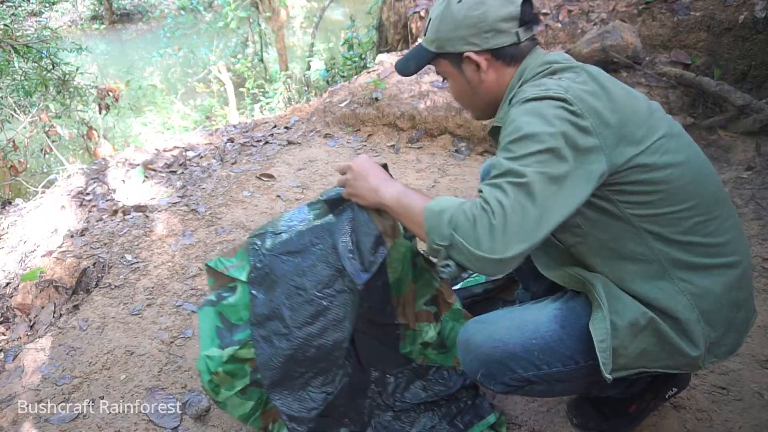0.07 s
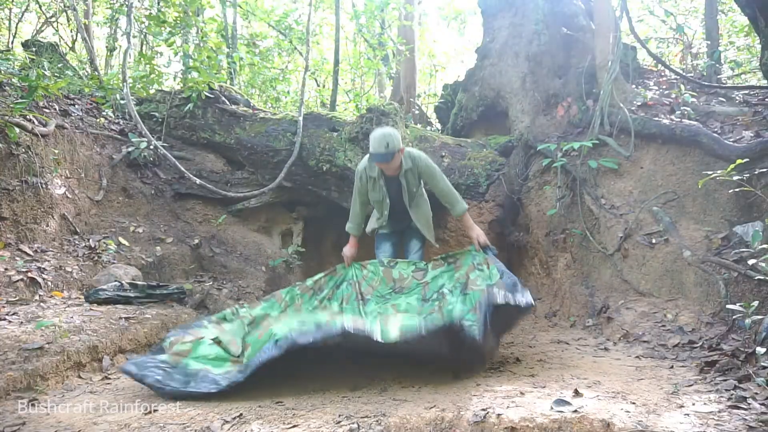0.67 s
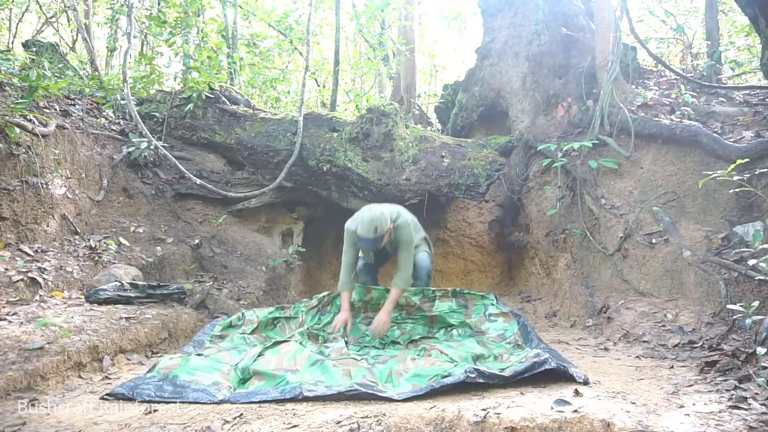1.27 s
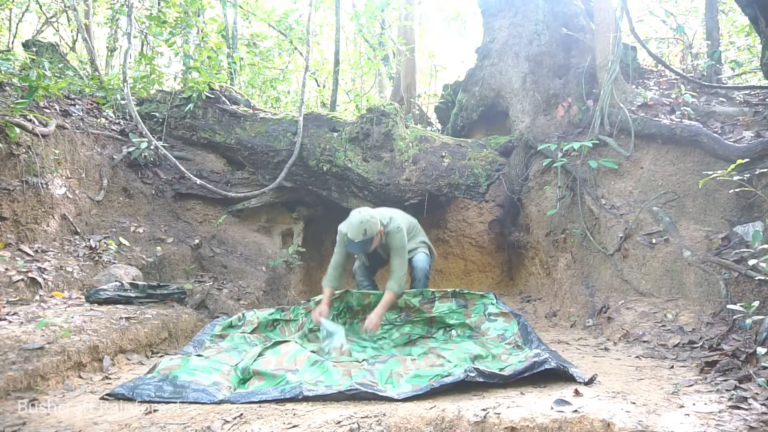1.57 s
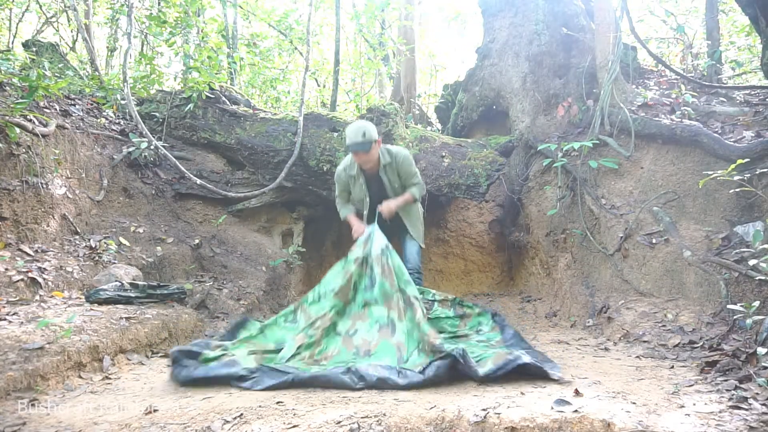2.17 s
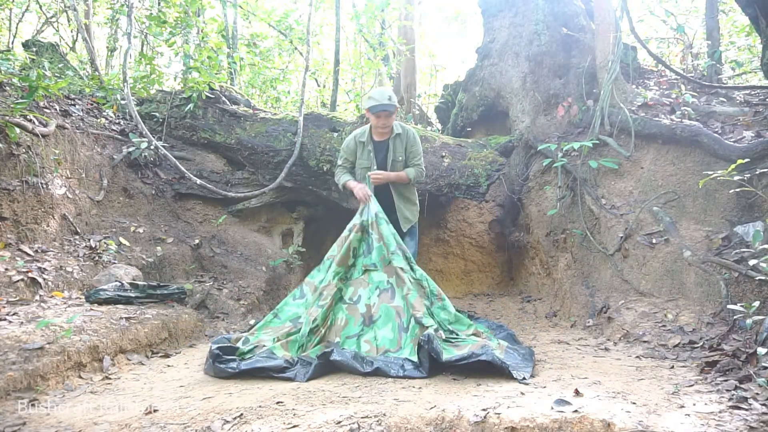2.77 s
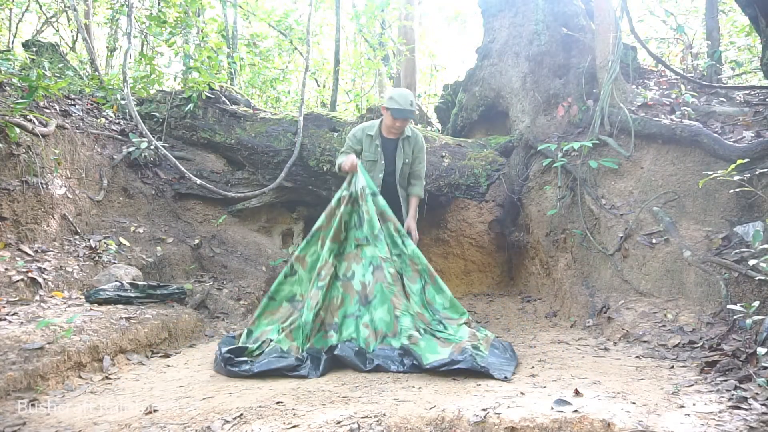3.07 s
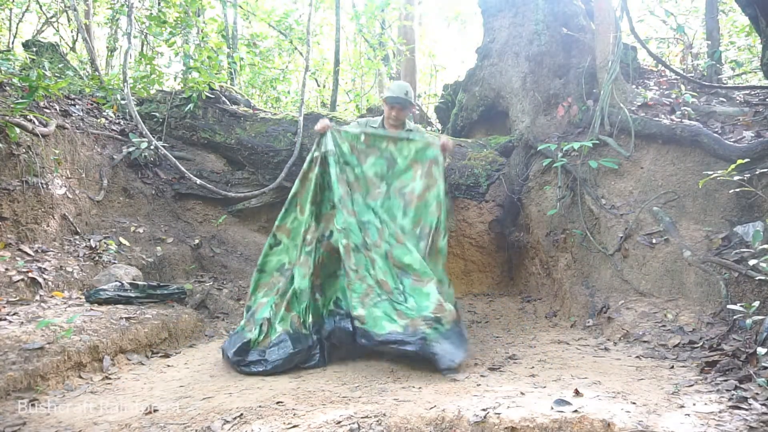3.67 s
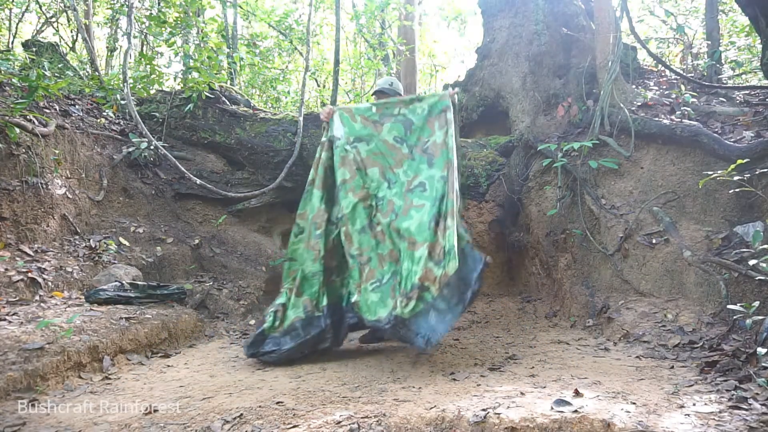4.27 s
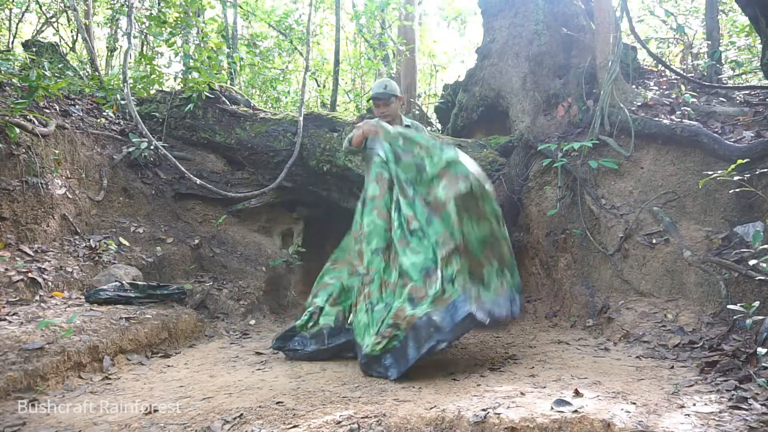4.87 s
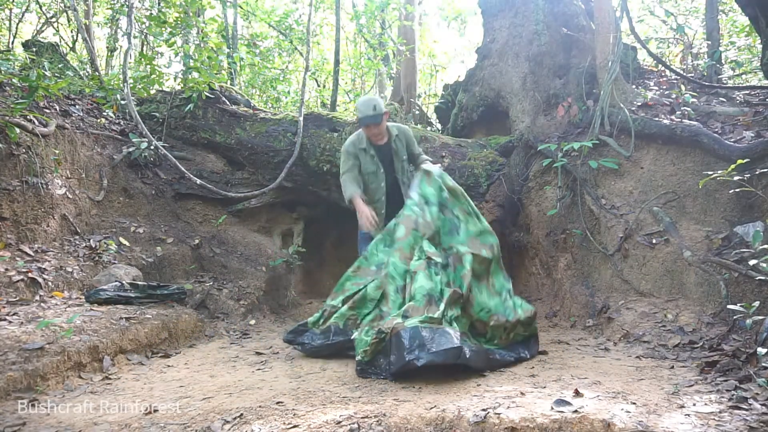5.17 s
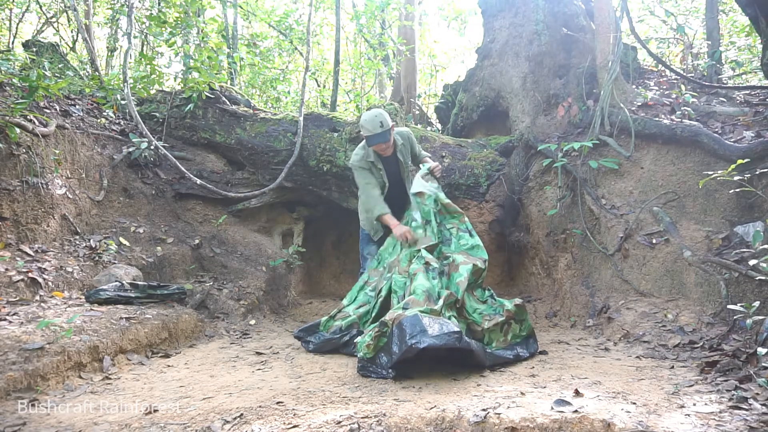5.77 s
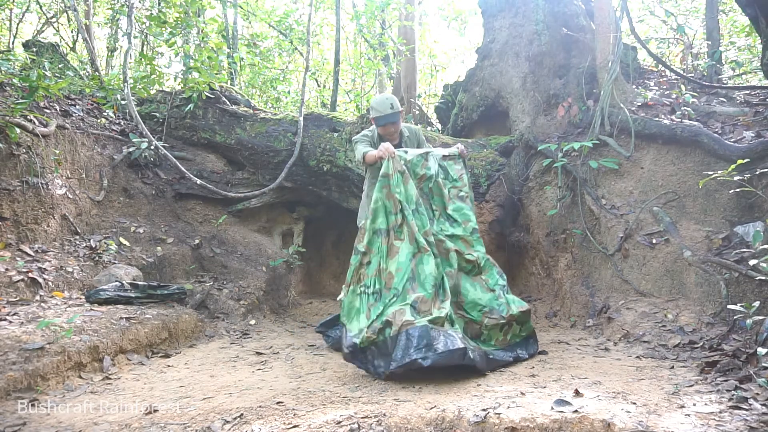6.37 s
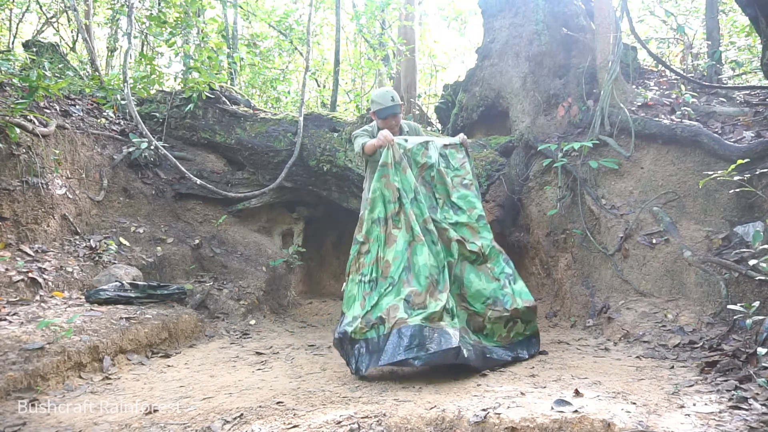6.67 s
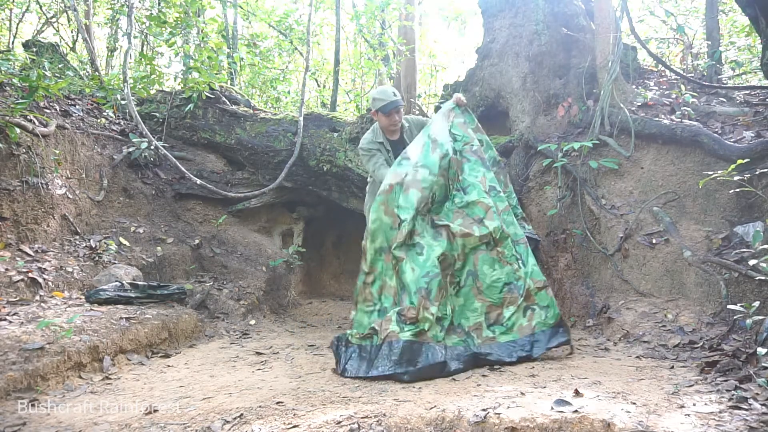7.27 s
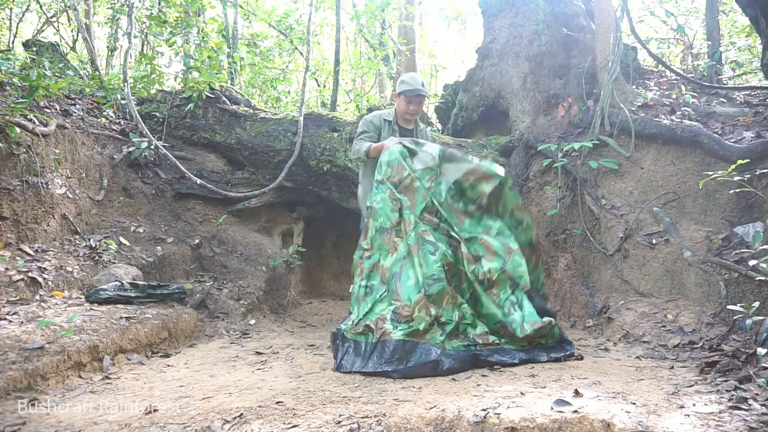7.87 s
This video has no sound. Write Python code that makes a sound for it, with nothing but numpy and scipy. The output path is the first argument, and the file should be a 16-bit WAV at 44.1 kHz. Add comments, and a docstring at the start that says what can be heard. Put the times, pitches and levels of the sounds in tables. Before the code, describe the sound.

Forest insects drone high and steady while someone unfolds and shakes a plastic tarp in crackling bursts, with a faint bird far off.

```python
"""First comes the crinkle of a plastic-backed tarp, handled on sandy forest ground just ahead of the
microphones and a little to the right. As it is unfolded, shaken and gathered up, its creases buckle in
showers of tiny clicks, its folds slide and billow, and now and then it snaps taut.
Insects drone high overhead and a bird calls faintly, far off among the trees.
About a third of a second in, all sound drops out for an instant; the insects are louder from then on."""
import sys
import numpy as np
from scipy import signal
from scipy.fft import rfft, irfft, next_fast_len
from scipy.io import wavfile
from scipy.ndimage import map_coordinates

SR = 44100
rng = np.random.default_rng(int(sys.argv[2]) if len(sys.argv) > 2 else 0)


def to_wav(sig):
    """Store sig (one row per channel, or 1-D mono) as 16-bit WAV at the path in sys.argv[1].

    Samples outside -1..1 are clipped; the rate is SR.
    """
    pcm = np.clip(np.atleast_2d(sig), -1, 1) * 32767
    pcm = np.round(pcm).astype(np.int16)
    wavfile.write(sys.argv[1], SR, pcm.T)  # frames by channels


N = 354078

# spectra of the still forest air and the insect chorus overhead: frequency_hz, relative_db
AIR_SPECTRUM = [(25, -14.5), (100, -16), (250, -16), (450, -3.5), (720, -8), (1000, -3.5), (2500, -0.5),
                (4000, -2.5), (6500, 1.5), (9000, -13), (16000, -36)]
CHORUS_SPECTRUM = [(4000, -33.5), (4800, -14), (5700, -29), (6500, -29), (7800, -16.5), (8900, -8),
                   (10100, -8.5), (11100, -4.5), (12200, 0), (12800, 0.5), (13500, -1), (14500, -7.5),
                   (15700, -14)]
# slow drift of the chorus: time_s, relative_db
CHORUS_DRIFT = [(0.42, -39), (1.94, -38.5), (8.03, -38)]
# insects nearest the microphones: pitch_hz, width_hz, relative_db
NEAR_INSECTS = [(8994, 8, -5), (10407, 12, -4), (11521, 8, 0), (11661, 11, 2), (11920, 14, 0),
                (12097, 8, 5), (12457, 14, 6.5), (12897, 8, 2), (13086, 16, -1), (13312, 12, -1),
                (13675, 16, -2), (14094, 16, -3)]
# far bird: start_s, length_s, start_pitch_hz, end_pitch_hz, flutter_share, level_db
BIRD_NOTES = [(.96, .08, 7350, 7550, .025, -56), (6.312, .04, 2610, 2720, .016, -49.5),
              (6.35, .04, 2860, 2835, .008, -46), (6.39, .07, 2815, 2835, .01, -49.5),
              (6.44, .045, 2540, 2495, .01, -48.5), (6.48, .09, 6950, 7000, .025, -57)]
# echo among the trunks: frequency_hz, t60_s
FOREST_DECAY = [(200, 0.21), (2500, 0.43), (10000, 0.36)]
# bounce off the sand, later when the tarp is held high: time_s, lag_ms
GROUND_LAG = [(0, 1.03), (.35, 1.3), (.4, 1.55), (1, 1.52), (1.45, 1.56), (1.85, 1.55), (2.8, 1.77),
              (3.5, 1.72), (4, 1.98), (4.5, 1.8), (4.75, 1.53), (5.6, 1.37), (6.2, 1.77), (7.2, 1.78),
              (8, 1.6)]
# likeness between left and right microphones: frequency_hz, coherence
FOREST_COHERENCE = [(60, 0.35), (700, 0.067), (4000, 0.34), (12000, 0.36)]
TARP_COHERENCE = [(200, 0.99), (1000, 0.84), (2500, 0.93), (5000, 0.57), (10000, 0.79)]
# the tarp's place right of centre: frequency_hz, left_minus_right_db
TARP_BALANCE = [(400, 0), (1200, -1.3), (2300, -3.5), (4500, -1)]
# spectra of the tarp buckling, billowing, sliding and flapping: frequency_hz, relative_db
CRINKLE_SPECTRUM = [(150, -41), (450, -20), (700, -8.5), (920, -6.5), (1150, -5), (1800, -0.5),
                    (2500, -0.5), (3500, -3), (5000, -4), (7000, -25), (10000, -20), (16000, -46.5)]
BILLOW_SPECTRUM = [(60, -29), (130, -25.5), (220, -11), (320, -8), (430, -8), (570, 0.5), (740, 3.5),
                   (920, -4), (1200, 1.5), (1600, -9.5), (3000, -7.5), (8000, -83)]
SLIDE_SPECTRUM = [(1000, -38.5), (3000, 1.5), (4800, 7.5), (6500, 4.5), (9000, 2), (12000, -4),
                  (16000, -17.5)]
FLAP_SPECTRUM = [(50, -47), (130, -37), (220, -4), (380, -9.5), (590, 2.5), (850, -1), (1150, 1),
                 (1700, -3.5), (3000, -18.5), (8000, -14)]
# faint motion between pulls, first lying on the ground, then hanging from the hands: time_s, relative_db
TARP_STIRRING = [(1.45, -76.5), (1.7, -66)]
# pulls on the tarp: start_s, length_s, crinkle_db, billow_over_crinkle_db, slide_over_crinkle_db
TARP_PULLS = [(-0.025, 0.185, -53, -6.5, -8), (0.128, 0.077, -48.5, 1, -4), (0.218, 0.066, -42, -8, -6.5),
              (0.352, 0.13, -46.5, -4.5, -3.5), (0.528, 0.27, -51.5, -6, -3.5),
              (0.708, 0.039, -42.5, -6.5, -6), (0.864, 0.19, -60, -3, 5), (1.493, 0.44, -52, -12.5, 0),
              (1.729, 0.2, -43, -6.5, -3), (2.025, 0.095, -40, -8, -2.5), (2.16, 0.1, -44.5, -8, -4),
              (2.36, 0.098, -45, -7, -3.5), (2.526, 0.081, -52.5, -6.5, 2.5), (2.73, 0.28, -54.5, -13, 0),
              (2.894, 0.29, -52, -5.5, -5.0), (3.253, 0.23, -49, -6.5, -5),
              (3.402, 0.16, -45.5, -3.5, -4.0), (3.605, 0.5, -50, -5, -2.5), (3.878, 0.058, -40, -8.5, -4),
              (3.96, 0.078, -54, 0.5, -13), (4.32, 0.041, -50, -16, -0.5), (4.632, 0.21, -52.5, -7, -0.5),
              (4.768, 0.163, -48.5, -4, -2.5), (4.954, 0.058, -41, -8.5, -5.0), (5.08, 0.18, -53, -6, -3.5),
              (5.353, 0.05, -45.5, -2.5, -2.5), (5.73, 0.053, -46, -7.5, -2.5),
              (5.856, 0.21, -45.0, -8.5, -2.5), (6.072, 0.2, -53.5, -8.5, -10.0),
              (6.455, 0.33, -61.5, -24, 3.5), (6.717, 0.083, -48, -9.0, 0.5),
              (6.942, 0.242, -50.0, -10.5, -2), (7.228, 0.25, -53.5, -8.5, -4),
              (7.436, 0.57, -49, -7.5, -2.0)]
# the sheet catches the air: centre_s, half_length_s, level_db
TARP_FLAPS = [(0.289, .02, -41), (0.9, 0.026, -50), (2.151, 0.035, -45), (3.52, 0.016, -38),
              (3.934, 0.0022, -33), (3.956, 0.0081, -40.5), (5.01, 0.0099, -50)]
# folds snapping taut: start_s, strength_db, centre_hz, shiver_over_crack_db
TARP_SNAPS = [(0.7511, -16, 2310, -17), (0.76, -18.5, 2300, -15), (1.319, -42, 2800, -16),
              (1.468, -38.5, 3000, -14), (1.534, -37.5, 2340, -13), (1.611, -36, 1290, -7),
              (2.077, -23.5, 2460, -16), (2.218, -30, 2550, -16), (2.94, -31, 2600, 2),
              (3.094, -40, 1170, -8), (3.297, -32, 1340, -5), (3.508, -27, 1150, -10),
              (3.701, -26.5, 1410, -20), (3.906, -30, 2080, -9), (3.934, -20, 2050, -17),
              (3.952, -30, 1900, -10), (4.021, -25, 2720, 1), (4.411, -31, 4500, -8), (4.997, -27, 1410, 0),
              (5.01, -25, 1300, -12), (5.031, -24, 1920, -18), (5.175, -30, 2010, -16),
              (5.445, -23, 3600, -11), (5.665, -29.5, 3200, -15), (6.097, -23, 2920, -24),
              (6.216, -32, 1880, -11), (6.334, -30, 2630, -13), (6.782, -25.5, 3020, -6),
              (6.807, -29, 4000, -9), (6.872, -30, 1540, -8), (7.13, -32, 1940, -16)]
# the instant of silence: time_s, gain
DROPOUT = [(.336, 1), (.341, .02), (.355, 0), (.37, 0), (.388, 1)]

RISE_S, FALL_DB_PER_S, USUAL_PULL_DB = 0.068, 87.5, -47  # how a usual pull gathers speed and dies away
BRISKNESS = 0.13  # harder pulls rise and fall faster: dB of speed per dB of pull
STIRRING_SLIDE_DB = -4  # the stirring sheet hardly slides
CREASES_PER_S, CROWDING = 550, .6  # buckling rate at -52 dB of crinkle; dB of rate per dB of crinkle
TICKS_PER_S, TICK_DB, TICK_T60_S = 30, -12, 0.0048  # single stiff creases, level relative to the rest
SHIVER_T60_S = 0.1  # the creases that a snap sets off
TOP_HZ = 15780


def amp(db):
    """Decibels to gain."""
    return 10 ** (np.asarray(db) / 20)


def unit(x):
    """x at rms 1."""
    return x / np.sqrt(np.mean(x ** 2) + 1e-20)


def along(points, hz):
    """Read (frequency_hz, value) points along a log frequency axis."""
    frequencies, values = np.transpose(points)
    return np.interp(np.log(hz + 1), np.log(frequencies + 1), values)


def curve(points):
    """One value per sample from (time_s, value) points."""
    return np.interp(np.arange(N) / SR, *np.transpose(points))


def wobble(rate, hop=32):
    """A smooth random curve, rate knots a second."""
    steps = np.arange(0, N + hop, hop)
    knots = rng.standard_normal(N // hop)
    return np.interp(np.arange(N), steps, map_coordinates(knots, [steps * rate / SR], mode="wrap"))


def filtered(x, response):
    """x shaped by a gain that depends on frequency."""
    size = next_fast_len(N + SR // 2)
    return irfft(rfft(x, size) * response(np.fft.rfftfreq(size, 1 / SR)), size)[..., :N]


def coloured(x, spectrum, size=2048):
    """x through a causal filter with the given spectrum."""
    cepstrum = irfft(np.log(amp(along(spectrum, np.fft.rfftfreq(size, 1 / SR)))))
    cepstrum[1:size // 2] *= 2
    cepstrum[size // 2 + 1:] = 0
    impulse = irfft(np.exp(rfft(cepstrum)))
    return signal.fftconvolve(x, impulse[None], axes=1)[:, :N]


def stereo(pair, coherence):
    """Spread two unrelated signals over the left and right microphones with the given coherence."""
    turn = lambda hz: np.arccos(np.clip(along(coherence, hz), -1, 1)) / 2
    mid, side = filtered(pair, lambda hz: np.array([np.cos(turn(hz)), np.sin(turn(hz))]))
    return np.array([mid + side, mid - side])


def noise():
    """Two unrelated white noises."""
    return rng.standard_normal((2, N))


def add(track, start_s, sound):
    """Mix a short sound into a track."""
    part = track[..., max(round(start_s * SR), 0):][..., :sound.shape[-1]]
    part += sound[..., :part.shape[-1]]


def forest_air():
    """Still air: a faint hiss all around the microphones."""
    return amp(-57) * unit(coloured(stereo(noise(), FOREST_COHERENCE), AIR_SPECTRUM))


def insects():
    """High overhead, many thin insect tones merge into a shrill band; a few near singers stand out."""
    grid_hz = np.arange(0, SR / 2, 14)
    voices_db = 1.3 * rng.standard_normal(len(grid_hz))
    crowd = lambda hz: amp(along(CHORUS_SPECTRUM, hz) + np.interp(hz, grid_hz, voices_db))
    near_power = lambda hz: sum((amp(db) / (1 + ((hz - pitch_hz) / width_hz) ** 2)) ** 2
                                for pitch_hz, width_hz, db in NEAR_INSECTS)
    song = unit(filtered(noise(), lambda hz: np.sqrt(crowd(hz) ** 2 + near_power(hz))))
    opening_db = np.where(np.arange(N) / SR < DROPOUT[2][0], -13, 0)  # fainter until the dropout
    level_db = curve(CHORUS_DRIFT) + opening_db + 2.02 + 0.28 * wobble(11)
    return amp(level_db) * stereo(song, FOREST_COHERENCE) * amp([[-.6], [.6]])  # slightly to the right


def bird():
    """A far bird gives short whistles and thin, fluttering chirps."""
    out = np.zeros((1, N))
    for start_s, length_s, start_hz, end_hz, flutter, db in BIRD_NOTES:
        size = int(length_s * SR)
        pitch_hz = np.linspace(start_hz, end_hz, size) * (1 + flutter * wobble(318)[:size])
        swell = signal.windows.tukey(size, .3)
        add(out, start_s, amp(db) * swell * np.sin(2 * np.pi * np.cumsum(pitch_hz) / SR))
    return out


def forest_echo(x, longer=1):
    """Trunks and an earth bank scatter a diffuse tail; longer stretches it for a far source."""
    hz, t, spectra = signal.stft(rng.standard_normal((2, SR)), SR, nperseg=256)
    t60_s = longer * along(FOREST_DECAY, hz)[:, None]
    tail = signal.istft(spectra * amp(-60 * t / t60_s), SR, nperseg=256)[1]
    return signal.fftconvolve(x, tail / np.linalg.norm(tail[0]), axes=1)[:, :N]


def with_ground_bounce(x, share=0.21, dull_hz=4500):
    """A duller copy reaches the microphones off the sand; its changing lag sweeps a comb through x."""
    samples = np.arange(N)
    dulled = filtered(x, lambda hz: 1 / (1 + (hz / dull_hz) ** 2))
    earlier = samples - curve(GROUND_LAG) * SR / 1000
    return x + share * np.array([np.interp(earlier, samples, side) for side in dulled])


def flaps():
    """The loose sheet fills with air: a brief, dull puff."""
    t = np.arange(N) / SR
    swell = sum(amp(db) * np.exp(-.5 * ((t - centre_s) / half_s) ** 2)
                for centre_s, half_s, db in TARP_FLAPS)
    return swell * unit(coloured(noise(), FLAP_SPECTRUM))


def snaps():
    """A fold pulled taut cracks and sets small creases shivering; harder pulls give shorter cracks."""
    out, t = np.zeros((2, N)), np.arange(SR // 10) / SR
    for start_s, db, centre_hz, shiver_db in TARP_SNAPS:
        t60_s = np.interp(db, [-30, -19], [.016, .006])
        crack = amp(-60 * t / t60_s)
        shiver = amp(shiver_db - 60 * t / SHIVER_T60_S + 3.3 * wobble(420)[:len(t)])
        fold_band = signal.butter(2, [centre_hz / 2.5, centre_hz * 1.9], "band", fs=SR)
        burst = signal.lfilter(*fold_band, (crack + shiver) * rng.standard_normal((2, len(t))))
        add(out, start_s, amp(db - 3) * burst / abs(burst).max(axis=1, keepdims=True))
    return out


def handling():
    """Crinkle, billow and slide in dB: each pull sets the sheet moving, holds, and lets it settle."""
    t = np.arange(N) / SR
    stirring_db = curve(TARP_STIRRING)
    power = amp([stirring_db, stirring_db, stirring_db + STIRRING_SLIDE_DB]) ** 2
    for start_s, length_s, db, billow_db, slide_db in TARP_PULLS:
        age_s = t[:int((length_s + 1) * SR)]
        speed = amp(BRISKNESS * (db - USUAL_PULL_DB))
        rise = np.minimum(speed * age_s / RISE_S, 1)
        settle = amp(-speed * FALL_DB_PER_S * np.maximum(age_s - length_s, 0))
        gains = amp([db, db + billow_db, db + slide_db])
        add(power, start_s, np.outer(gains, rise * settle) ** 2)
    return 10 * np.log10(power)


def buckling(per_second, spread_db, colour_db, t60_s):
    """Creases buckle in brief bursts: a few large, many small, each with its own strength per octave."""
    onsets = np.flatnonzero(rng.random(N) < per_second / SR)
    size_db = spread_db * np.minimum(rng.exponential(size=N), 3.5)[onsets]
    size = amp(size_db) / np.sqrt(per_second[onsets])  # denser, yet no louder
    out = np.zeros((2, N))
    for low_hz in (250, 500, 1000, 2000, 4000, 8000):
        energy = np.zeros(N)
        energy[onsets] = (size * amp(colour_db * rng.random(N)[onsets])) ** 2
        envelope = np.sqrt(signal.lfilter([1], [1, -amp(-120 / (t60_s * SR))], energy))
        octave = signal.butter(1, [low_hz, 2 * low_hz], "band", fs=SR)
        out += signal.lfilter(*octave, envelope * noise())
    return unit(out)


def rustle():
    """Creases buckle in clumps, denser when the tarp moves faster, while its folds billow and slide."""
    crinkle_db, billow_db, slide_db = handling()
    clumps = wobble(55)
    per_second = CREASES_PER_S * amp(CROWDING * np.clip(crinkle_db + 52, -20, 12))
    creases = buckling(per_second, spread_db=0.5, colour_db=23, t60_s=0.029)
    ticks = buckling(np.full(N, TICKS_PER_S), spread_db=2.5, colour_db=18, t60_s=TICK_T60_S)
    crackle = creases + amp(TICK_DB) * ticks + .4 * noise()
    crinkle = amp(crinkle_db + 2.44 + 0.38 * clumps) * unit(coloured(crackle, CRINKLE_SPECTRUM))
    billow_gain = amp(billow_db + 2.63 + 1.5 * wobble(40))
    billow = billow_gain * unit(coloured(0.46 * creases + noise(), BILLOW_SPECTRUM))
    slide = amp(slide_db + 2.6 + 1.08 * clumps) * unit(coloured(.5 * creases + noise(), SLIDE_SPECTRUM))
    return crinkle + billow + slide


def scene():
    """From the microphones: tarp ahead and a little right, bird far off, insects and air all around."""
    tarp = stereo(with_ground_bounce(rustle() + snaps() + flaps()), TARP_COHERENCE)
    tarp = filtered(tarp, lambda hz: amp(along(TARP_BALANCE, hz) * np.array([[.5], [-.5]])))
    calls = bird()
    far_bird = calls + amp(-1) * forest_echo(calls, longer=1.6)
    return forest_air() + far_bird + tarp + amp(-11) * forest_echo(tarp) + insects()


def record(dry):
    """The sound drops out for an instant, and nothing above TOP_HZ is heard."""
    return filtered(dry * curve(DROPOUT), lambda hz: hz < TOP_HZ)


dry = scene()
out = record(dry)
to_wav(out)
```